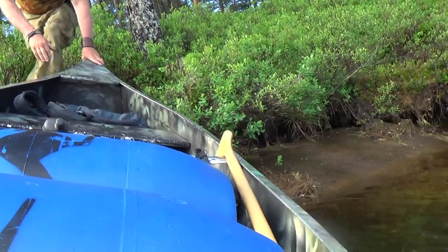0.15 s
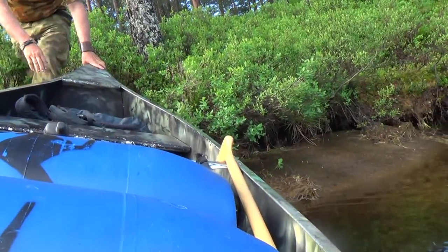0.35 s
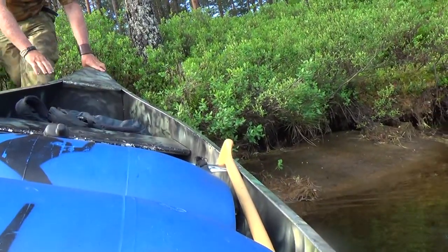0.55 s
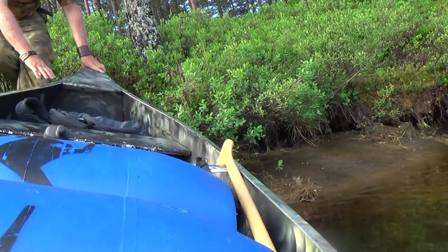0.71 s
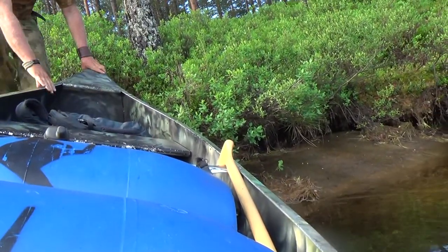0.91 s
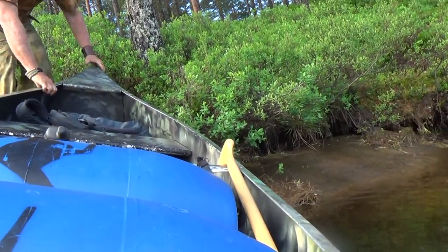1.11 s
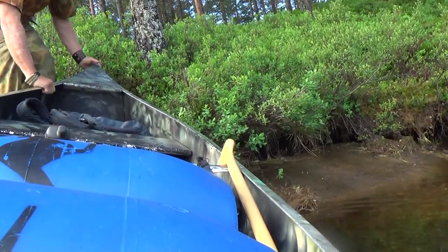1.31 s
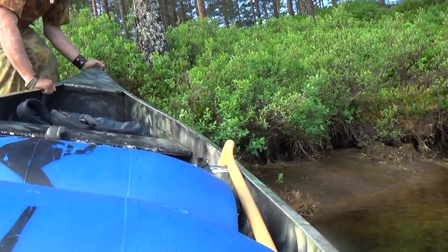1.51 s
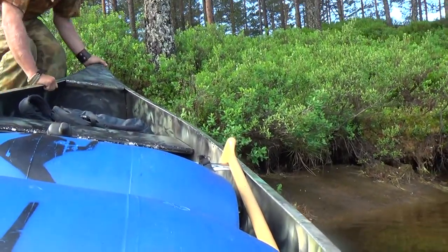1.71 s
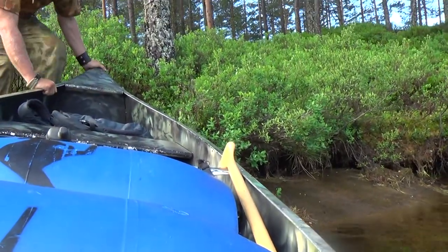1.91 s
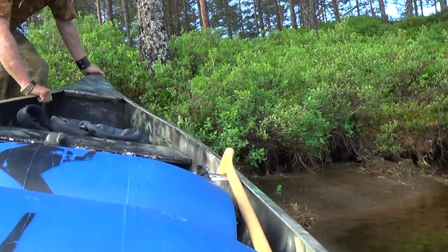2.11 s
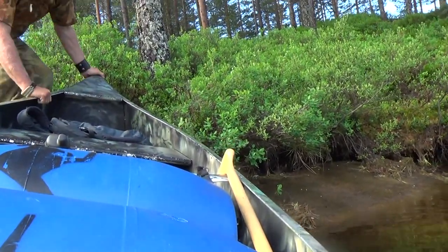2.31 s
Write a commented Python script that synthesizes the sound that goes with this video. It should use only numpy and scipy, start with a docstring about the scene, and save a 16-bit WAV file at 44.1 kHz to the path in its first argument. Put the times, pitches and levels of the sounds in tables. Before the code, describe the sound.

Hollow thumps of a canoe being pushed off a grassy bank: a strong clustered knock, a faint rub and water gulp, crisp twig clicks, a quieter stretch, then another knock and low scrape, heard from aboard with faint outdoor hiss.

```python
"""Two knocks and small bumps ring the hull of a canoe pushed off a grassy bank, heard from a microphone on the boat.
Half-sine blows drive damped hull modes; coloured bursts of grains make the scuffs and clicks of grass and twigs,
and the crack and rough tail of the knocks.
Filtered grains also rumble as the hull drags, rub the gunwale, and swell and fade as grass brushes the side.
Water gulps are rising damped tones, fittings ping as single modes, and filtered noise is the outdoor hiss."""
import sys
import numpy as np
from scipy import signal
from scipy.fft import rfft, irfft
from scipy.io import wavfile
from scipy.ndimage import uniform_filter1d

SR = 44100
rng = np.random.default_rng(int(sys.argv[2]) if len(sys.argv) > 2 else 0)


def store_wav(level_fs):
    """Save 16-bit WAV to argv[1]."""
    pcm = np.round(np.clip(np.atleast_2d(level_fs), -1, 1) * 32767)
    wavfile.write(sys.argv[1], SR, pcm.T.astype(np.int16))


def field_ratio(decibels):
    """Amplitude ratio for a level in dB (20 dB per decade); scalars and array-likes work."""
    return 10 ** (np.asarray(decibels, dtype=float) / 20)


N = 105840
T = np.arange(N) / SR
HZ = np.maximum(np.fft.rfftfreq(N, 1 / SR), 1)


def curve(rows, x, log=False):
    """Straight lines through (x, y) rows, over log x if asked."""
    a = np.array(rows, float)
    if log:
        return np.interp(np.log(x), np.log(a[:, 0]), a[:, 1])
    return np.interp(x, a[:, 0], a[:, 1])


def colour(x, db):
    """Weights the spectrum by dB per bin."""
    return irfft(rfft(x) * field_ratio(db), N)


def unit(x):
    """Scales to rms 1."""
    return x / np.sqrt(np.mean(x ** 2))


def walk(rate_hz):
    """Random levels drawn at rate_hz, joined by linear slews."""
    hold = int(SR / rate_hz)
    steps = np.repeat(rng.standard_normal(N // hold + 1), hold)
    return 1.4 * uniform_filter1d(steps, hold)[:N]


def grains(spread_db, grains_per_s=15000):
    """Dense random clicks of uneven size, rms 1."""
    hit = rng.random(N) < grains_per_s / SR
    size = field_ratio(spread_db * np.minimum(rng.exponential(size=N), 4))
    return unit(hit * rng.standard_normal(N) * size)


def mode(t, hz, t60_s, cycles):
    """One resonance builds up over some cycles and dies away exponentially."""
    decay = 1000. ** (-t / t60_s)
    swell = 1 - np.exp(-t * hz / cycles)
    return np.sin(2 * np.pi * hz * t) * decay * swell


def wide(mid, other, side_rows):
    """Left and right from a mid and an unrelated, weaker side."""
    side = colour(other, curve(side_rows, HZ, log=True))
    return np.array([mid + side, mid - side])


# Hull path to the ports: (frequency [Hz], left over right [dB])
HULL_PATH = [(60, 11), (110, 13.0), (200, 11.5), (380, 8), (700, 2.5), (1290, 3), (4400, 2), (15000, 9)]


def via_hull(x):
    """The left port sits nearer the hull and takes more of its sound, above all the bass."""
    ratio = field_ratio(curve(HULL_PATH, HZ, log=True))
    return np.array([irfft(rfft(x) * 2 * g / (1 + ratio), N) for g in (ratio, 1)])


# Main hull modes: (frequency [Hz], t60 [s], level struck at spot 0 [dB], level at spot 1 [dB])
HULL_MODES = [(121.4, 0.29, -5, -8.5), (147.7, 0.24, -5, -12), (194, 0.12, 7, -4), (239.4, 0.24, 1, -2.5),
              (299, 0.15, 6, 3.5), (324.8, 0.39, -7.5, -5), (381.6, 0.15, -1.5, 1), (423.5, 0.11, 4, -10),
              (453, 0.029, 15, 18.5), (494.5, 0.09, 5, 0), (537, 0.086, 4, 9.5), (608, 0.19, -12.5, -3.5),
              (737, 0.38, -13, -14.5), (833.5, 0.11, 0, -5), (893, 0.098, 0.5, -3), (993, 0.21, -4, -8),
              (1093, 0.34, -21, -38), (1290, 0.14, -2.5, -35), (1340, 0.19, -4, -23), (1640, 0.041, 8, -19),
              (760, 0.0087, 24.5, -2)]
# Extra initial swing while hull and bank still touch: (spot 0 [ratio], spot 1 [ratio])
THUD_SWING = [0.097, 0.14]


def hull_ring(t, spot):
    """Main modes of the hull, with extra swing at the start of each."""
    ring = np.zeros(len(t))
    for hz, t60_s, *spot_db in HULL_MODES:
        thud = 1 + THUD_SWING[spot] * np.exp(-t * hz / 1.5)  # decay constant 1.5 cycles
        ring += field_ratio(spot_db[spot]) * mode(t, hz, t60_s, cycles=0.93) * thud
    return ring


# Skin mode level before the spot offset: (frequency [Hz], level [dB])
SKIN_LEVEL = [(500, -17.5), (1000, -19.5), (2000, -11.5), (3500, -11.5), (7000, -19), (14000, -38)]
# Skin level offset: (spot 0 [dB], spot 1 [dB])
SKIN_OFFSET = [-1, -2.5]
# Share of the ring time left: (spot 0 [ratio], spot 1 [ratio])
SKIN_RING_SHARE = [0.82, 0.57]


def skin_ring(t, spot):
    """Dense small skin modes ring shorter with frequency; the share in step adds to the crack."""
    in_step, detune = 0.21, 0.0089  # ratios
    t60_500hz_s = 0.26 * SKIN_RING_SHARE[spot]
    ring = np.zeros(len(t))
    grid_hz = 500 * (15000 / 500) ** np.linspace(0, 1, num=800)
    for hz, (swing, shift) in zip(grid_hz, rng.standard_normal((len(grid_hz), 2))):
        t60_s = t60_500hz_s * (500 / hz) ** 0.46
        n = min(len(t), int(t60_s * SR))
        level = field_ratio(curve(SKIN_LEVEL, hz, log=True) + SKIN_OFFSET[spot])
        tone = mode(t[:n], hz * (1 + detune * shift), t60_s, cycles=0.43)
        ring[:n] += (swing + in_step) * level * tone
    return ring


# Blows, one list per spot: (time [s], impulse level [dB], contact [ms])
SPOT_BLOWS = [
    [(.2002, -39, 0.23), (.2028, -35, 0.51), (.2048, -25.5, 0.31), (.2655, -43.5, 0.48), (.318, -50, 0.45),
     (.752, -53, 0.65), (.785, -37, 7.4)],
    [(1.642, -56.5, 0.054), (1.778, -53, 0.14), (1.822, -52, 0.52), (1.883, -54, 0.17), (1.9275, -50, 0.08),
     (1.9322, -28.5, 0.29), (1.9375, -45, 1), (1.9455, -42, 1.15), (2.094, -48.5, 0.96), (2.106, -48, 0.64),
     (2.305, -59, 0.26)],
]


def knocks():
    """Half-sine pushes ring the hull's main modes and its dense skin modes."""
    t, out = T[:SR // 2], np.zeros(N)
    for spot, blows in enumerate(SPOT_BLOWS):
        ring = hull_ring(t, spot) + skin_ring(t, spot)
        push = np.zeros(N)
        for start_s, db, contact_ms in blows:
            pulse = np.sin(np.pi * np.clip((T - start_s) * 1000 / contact_ms, 0, 1))
            push -= field_ratio(db) * pulse / pulse.sum()
        out += signal.fftconvolve(push, ring)[:N]
    return via_hull(out)


# Scuffs and clicks of grass and twigs, and the crack and rough tail of the knocks:
# (peak time [s], rise sigma [s], fall constant [s], level [dB], centre [Hz], sigma [octaves])
GRAIN_BURSTS = [(.015, 0.033, 0.04, -49.5, 6000, 4.8), (0.083, 0.014, 0.0027, -50, 6040, 3.7),
                (0.207, 0.002, 0.0088, -31.5, 3150, 0.72), (0.297, 0.022, 0.036, -43.5, 5900, 6.6),
                (0.331, 0.022, 0.0047, -40, 5650, 2.3), (0.738, 0.0011, 0.0042, -27.5, 6000, 1.8),
                (0.743, 0.0011, 0.0024, -26.5, 10650, 0.12), (.744, 0.0012, 0.0022, -29.5, 7400, 0.22),
                (0.753, 0.01, 0.015, -33.5, 2040, 1.67), (0.797, 0.0035, 0.0087, -42.5, 9100, 2.3),
                (1.001, 0.0035, 0.0077, -48, 9400, 0.32), (1.07, 0.018, 0.011, -45, 3300, 1.5),
                (1.118, 0.024, 0.032, -49.5, 1450, 0.79), (1.128, 0.019, 0.031, -42, 3250, 9.6),
                (1.305, 0.01, 0.013, -49, 5000, 4), (1.536, .002, 0.0058, -51, 9000, 1.1),
                (1.612, 0.0044, 0.0071, -52.5, 10200, 0.95), (1.642, .001, 0.0054, -43, 5750, 5),
                (1.695, 0.038, 0.017, -52.5, 3480, 0.94), (1.778, 0.0018, 0.0032, -50.5, 2920, .2),
                (1.796, 0.0076, 0.0071, -46, 4870, 1.2), (1.824, 0.002, 0.005, -48, 2400, 0.35),
                (1.883, 0.0008, 0.0044, -38.5, 8640, 0.095), (1.884, .0012, 0.0091, -42.5, 3170, 0.15),
                (1.885, .0008, 0.0075, -38.5, 8000, 1.4), (1.896, 0.0038, 0.018, -42.5, 1490, 0.31),
                (1.9335, 0.0011, 0.0038, -30, 3440, 0.98), (1.991, 0.019, 0.024, -38.5, 404, 0.54),
                (2.128, 0.016, 0.03, -42.5, 6650, 6.2), (2.156, 0.03, 0.0076, -49.5, 7000, 7.3),
                (2.286, 0.011, 0.015, -50, 7300, 1.5), (2.34, 0.015, 0.019, -46.5, 3540, 1.24)]
# Stereo width of bursts and brush: (frequency [Hz], side over mid [dB])
GRAIN_SIDE = [(1000, -15), (4000, -22), (6000, -13), (15000, -14)]


def scuffs_and_cracks():
    """Each burst of grains rises, falls and has its own bell-shaped spectrum."""
    spectra = [rfft(grains(spread_db=1.0)) for _ in range(2)]
    out = np.zeros((2, N))
    for peak_s, rise_s, fall_s, db, hz, octaves in GRAIN_BURSTS:
        rise = np.exp(-.5 * ((T - peak_s) / rise_s) ** 2)
        fall = np.exp(-np.abs(T - peak_s) / fall_s)
        env = field_ratio(db) * np.where(T < peak_s, rise, fall)
        bell = np.exp(-.5 * (np.log2(HZ / hz) / octaves) ** 2)
        out += env * np.array([unit(irfft(x * bell, N)) for x in spectra])
    return wide(out[0], out[1], GRAIN_SIDE)


# Hull dragging: (time [s], level [dB])
DRAG_LEVEL = [(0.0, -53), (0.25, -54.5), (0.39, -50), (0.67, -55.5), (0.79, -55.5), (1.59, -55.5),
              (1.84, -50), (1.97, -46), (2.25, -53.5), (2.4, -52.5)]
# Drag spectrum: (frequency [Hz], relative density [dB per Hz])
DRAG_SPECTRUM = [(24, -55), (40, 8.5), (108, -4.5), (461, -3.5), (599, -10), (1320, -9), (1550, -7),
                 (1900, -10.5), (3690, -15), (5000, -22.5), (6500, -17), (11000, -120)]


def drag():
    """Uneven stick-slip grains rumble through the hull."""
    patchy = field_ratio(1.5 * walk(rate_hz=70))
    slips = grains(spread_db=0.8) * patchy
    rumble = unit(colour(slips, curve(DRAG_SPECTRUM, HZ, log=True)))
    return via_hull(rumble * field_ratio(curve(DRAG_LEVEL, T)))


# Sliding on the gunwale: (time [s], level [dB])
RUB_LEVEL = [(.41, -79), (.435, -62), (.6, -54), (.66, -59), (.72, -53)]
# Resonances it excites: (frequency [Hz], width [Hz], relative peak [dB per Hz])
RUB_MODES = [(1560, 90, 0), (3500, 450, -11)]


def rub():
    """Fine friction grains excite two narrow resonances."""
    ring = sum(field_ratio(db) / (1 + (2 * (HZ - hz) / width_hz) ** 2) for hz, width_hz, db in RUB_MODES)
    friction = unit(irfft(rfft(grains(spread_db=1.0)) * ring, N))
    rubbing = (T > RUB_LEVEL[0][0]) * (T < RUB_LEVEL[-1][0])
    return via_hull(friction * field_ratio(curve(RUB_LEVEL, T)) * rubbing)


# Grass along the side: (time [s], level before flicker [dB])
BRUSH_LEVEL = [(0.0, -56.5), (0.29, -60.5), (0.58, -52), (0.75, -49.5), (0.94, -51.5), (1.28, -61),
               (1.58, -62.5), (1.96, -54), (2.4, -60.5)]
# Brush spectrum: (frequency [Hz], relative density [dB per Hz])
BRUSH_SPECTRUM = [(1470, -45), (2660, -14), (5530, -7.5), (9720, -1), (13500, -3), (15500, -19)]


def brush():
    """Grass brushing along the side, swelling and fading: coloured grains whose level flickers."""
    def rustle():
        fine = unit(colour(grains(spread_db=-1.5), curve(BRUSH_SPECTRUM, HZ, log=True)))
        return fine * field_ratio(curve(BRUSH_LEVEL, T) + 1.2 * walk(rate_hz=25.7))
    return wide(rustle(), rustle(), GRAIN_SIDE)


# Water gulps: (time [s], start frequency [Hz], level [dB], t60 [s])
WATER_GULPS = [(.505, 200, -45, .14), (.54, 400, -47, .09)]


def gulps():
    """Damped tones glide upward exponentially."""
    rise_oct_per_s = 16.
    k = rise_oct_per_s * np.log(2)
    out = np.zeros(N)
    for start_s, hz, db, t60_s in WATER_GULPS:
        u = np.clip(T - start_s, 0, t60_s)
        tone = np.sin(2 * np.pi * hz * np.expm1(k * u) / k)
        decay = 1000. ** (-u / t60_s) * (u < t60_s)
        attack = np.minimum(u / 0.002, 1)
        out += field_ratio(db) * tone * decay * attack
    return via_hull(out)


# Small fittings: (time [s], frequency [Hz], level [dB], t60 [s])
FITTING_PINGS = [(.327, 2050, -38, .05), (1.894, 1550, -42, .09), (2.014, 2050, -46, .04),
                 (2.18, 1570, -46, .06)]


def pings():
    """Small fittings ring as single short modes."""
    out = np.zeros(N)
    for start_s, hz, db, t60_s in FITTING_PINGS:
        out += field_ratio(db) * mode(np.maximum(T - start_s, 0), hz, t60_s, cycles=0.67)
    return via_hull(out)


# Outdoor hiss spectrum: (frequency [Hz], relative density [dB per Hz])
AIR_SPECTRUM = [(15, -56), (25, -4), (232, -14), (346, -6.5), (385, -3), (451, -5.5), (830, -3.5),
                (1240, -7.5), (14200, -31)]
# Hiss stereo width: (frequency [Hz], side over mid [dB])
AIR_WIDTH = [(25, -4), (130, -8), (300, -46), (700, -14.5), (2000, -22), (4000, -20), (7000, -3.5),
             (15000, -17)]


def air():
    """Steady outdoor hiss: filtered noise, mostly common to both ports."""
    def hiss():
        noise = rng.standard_normal(N)
        return field_ratio(-55) * unit(colour(noise, curve(AIR_SPECTRUM, HZ, log=True)))
    return wide(hiss(), hiss(), AIR_WIDTH)


def scene():
    """Sums all sources."""
    return knocks() + scuffs_and_cracks() + drag() + rub() + brush() + gulps() + pings() + air()


def roll_off(x):
    """The treble ends steeply here."""
    return signal.sosfilt(signal.butter(12, 15630, fs=SR, output="sos"), x)


# Microphone response: (frequency [Hz], gain [dB])
MIC_RESPONSE = [(20, -30), (50, -15.5), (100, 2), (150, 3.5), (11000, -2.5), (13500, -3.5), (14400, -7),
                (15000, -23), (15700, -45)]


def record(dry):
    """The microphone loses the deep bass and the top."""
    response_db = curve(MIC_RESPONSE, HZ, log=True)
    heard = np.array([colour(x, response_db) for x in dry])
    return roll_off(heard)


dry = scene()
out = record(dry)
store_wav(out)
```